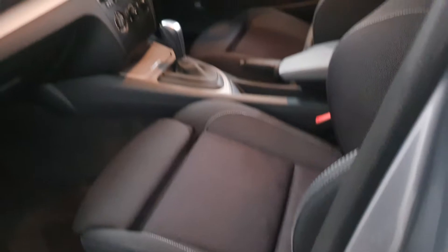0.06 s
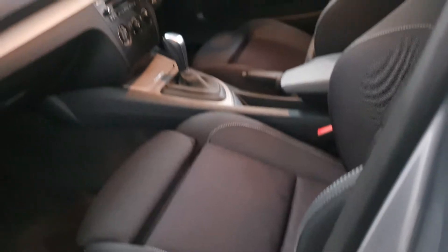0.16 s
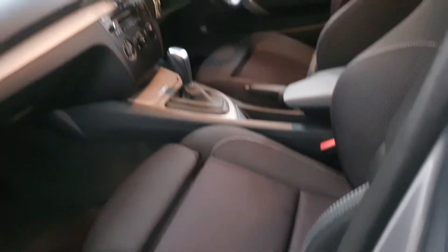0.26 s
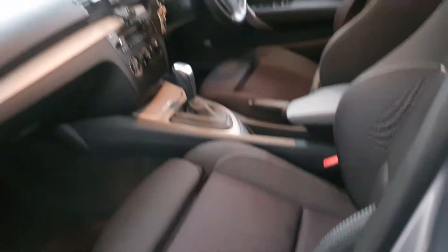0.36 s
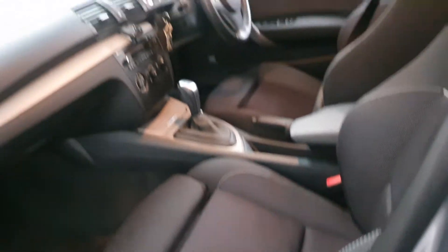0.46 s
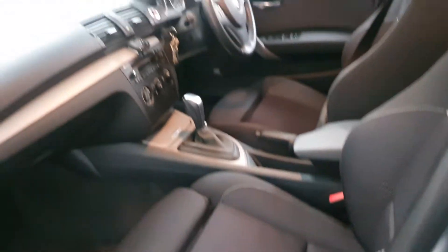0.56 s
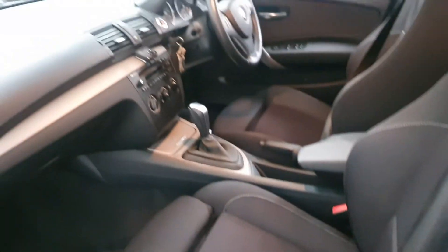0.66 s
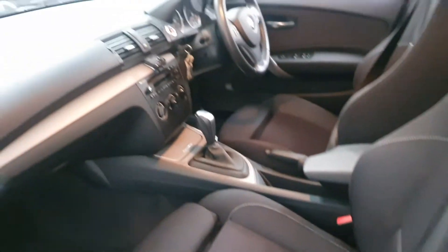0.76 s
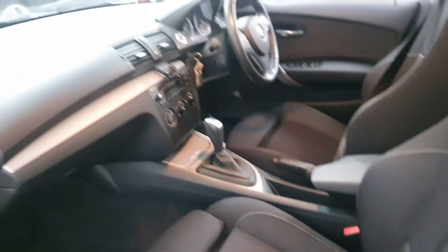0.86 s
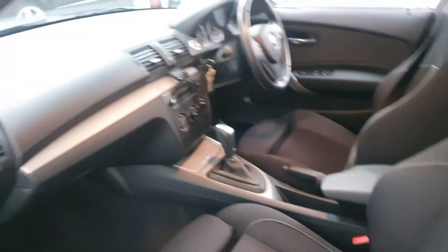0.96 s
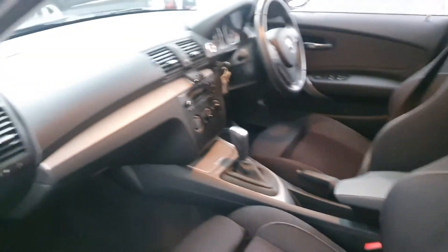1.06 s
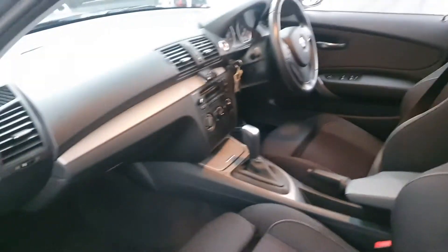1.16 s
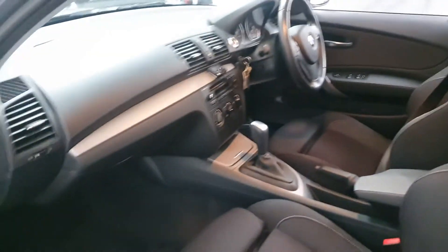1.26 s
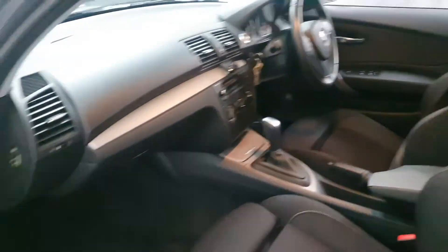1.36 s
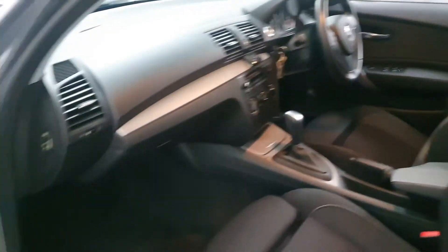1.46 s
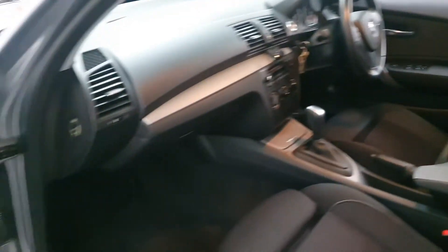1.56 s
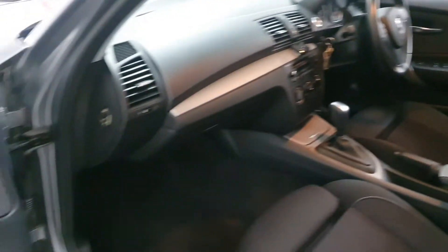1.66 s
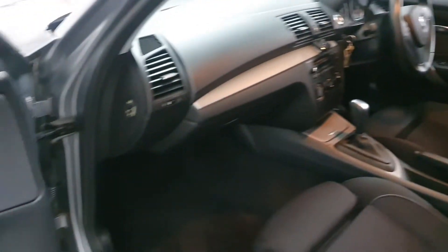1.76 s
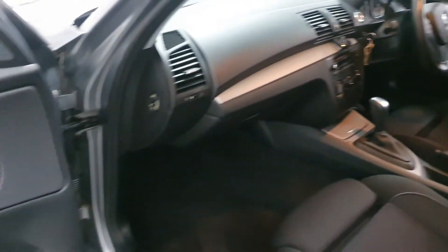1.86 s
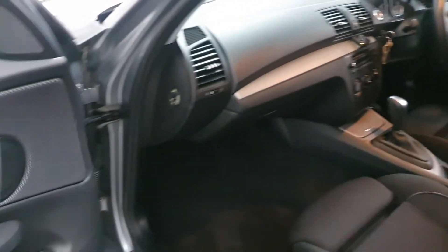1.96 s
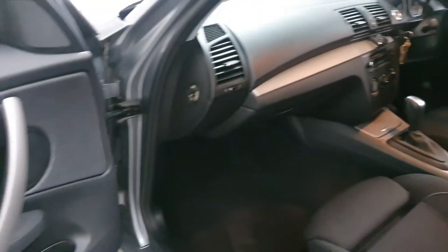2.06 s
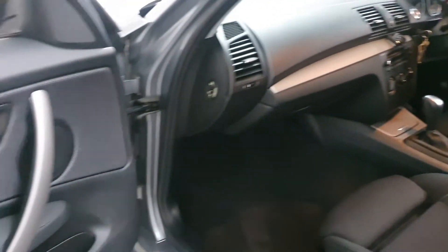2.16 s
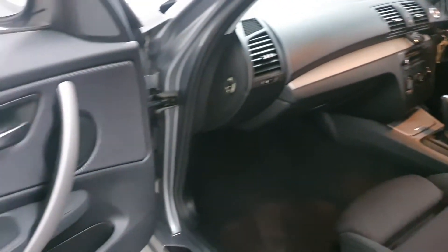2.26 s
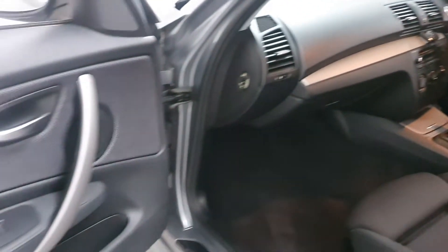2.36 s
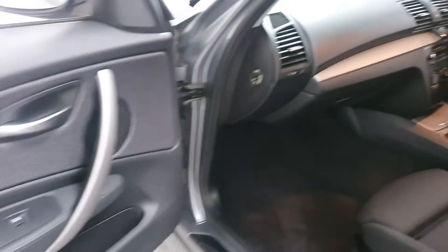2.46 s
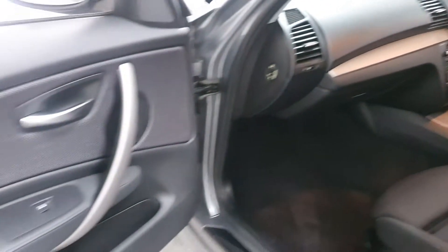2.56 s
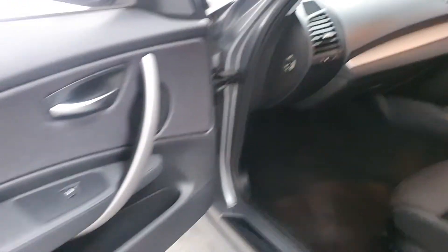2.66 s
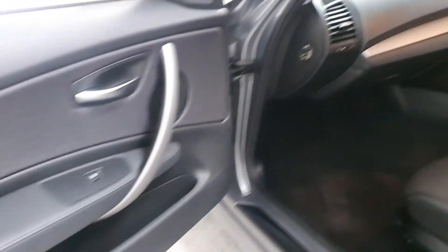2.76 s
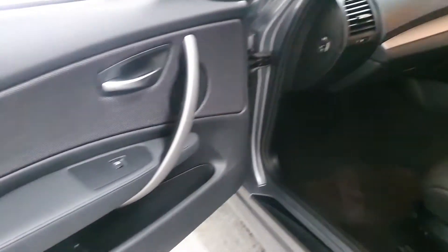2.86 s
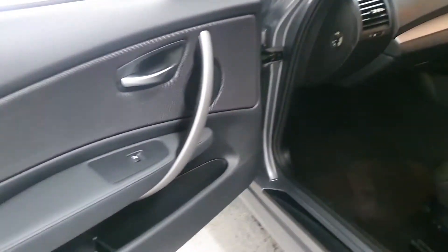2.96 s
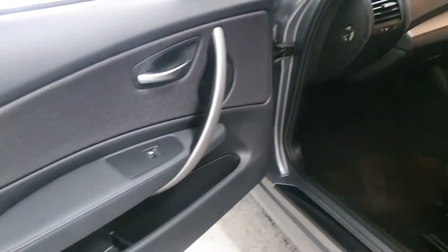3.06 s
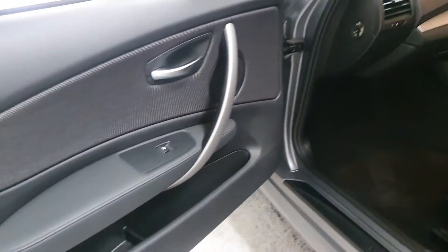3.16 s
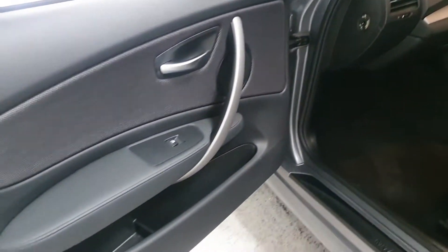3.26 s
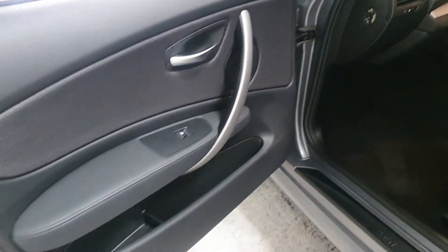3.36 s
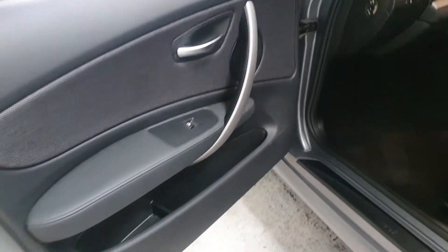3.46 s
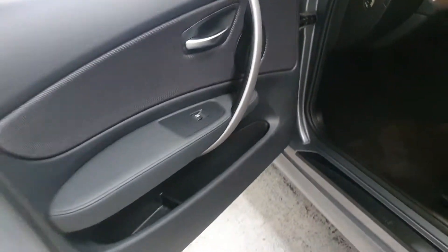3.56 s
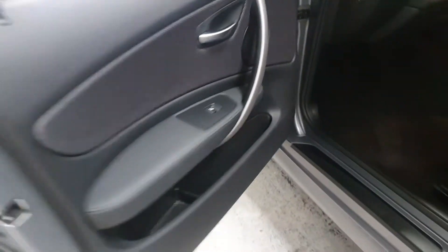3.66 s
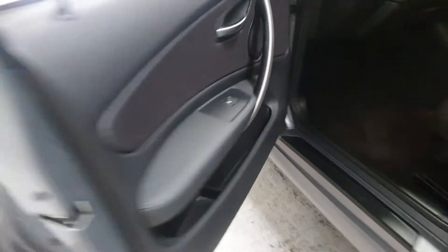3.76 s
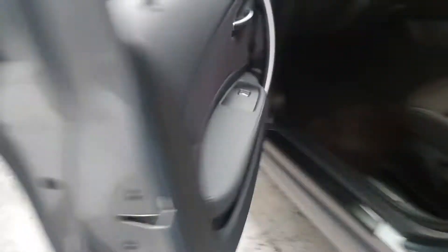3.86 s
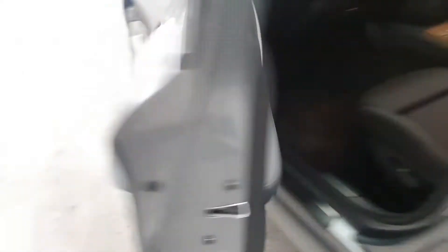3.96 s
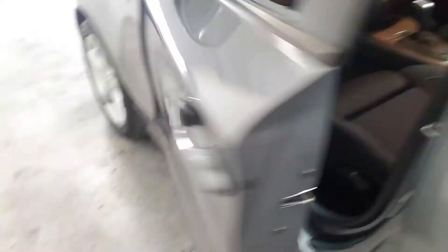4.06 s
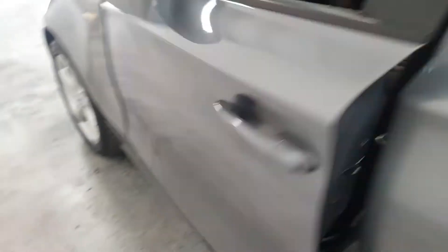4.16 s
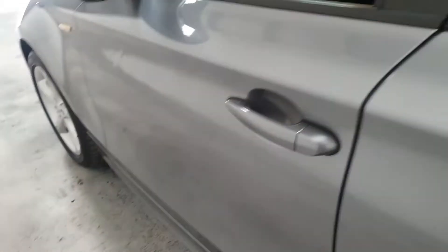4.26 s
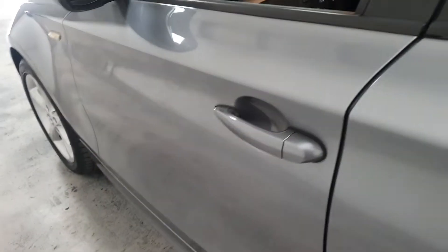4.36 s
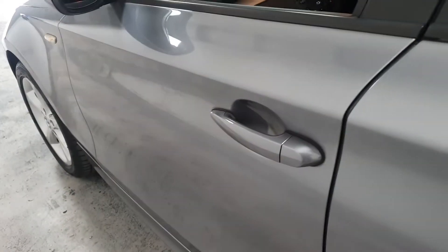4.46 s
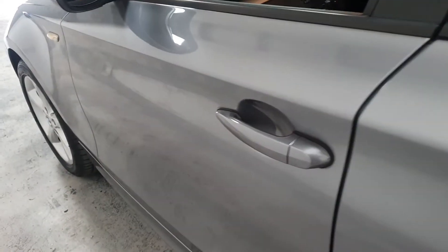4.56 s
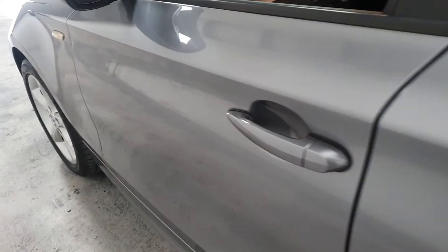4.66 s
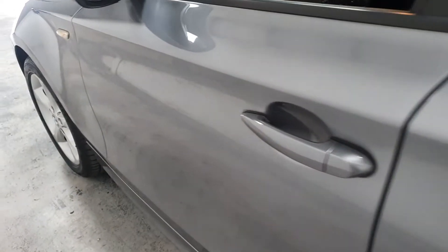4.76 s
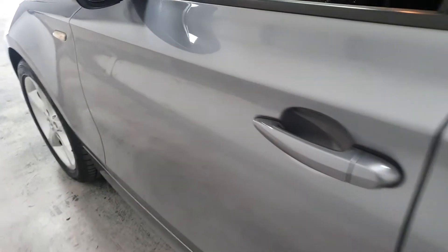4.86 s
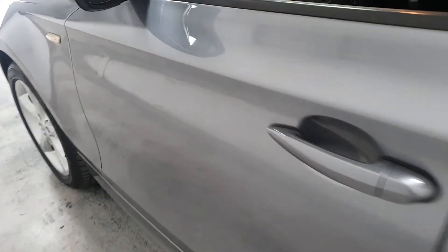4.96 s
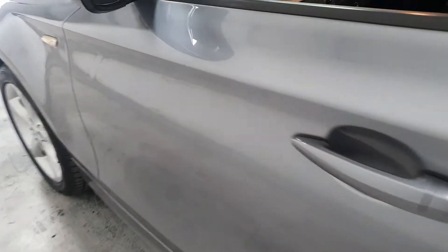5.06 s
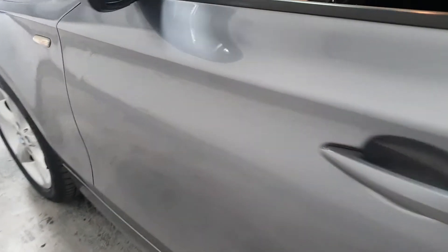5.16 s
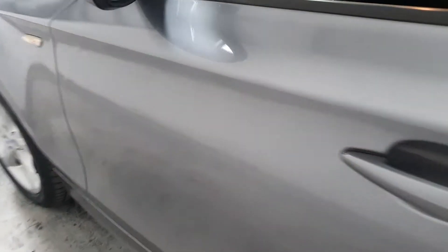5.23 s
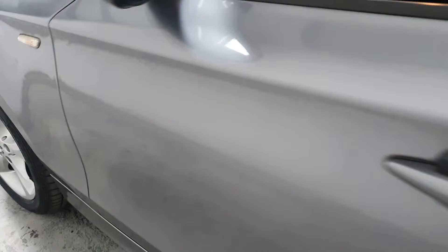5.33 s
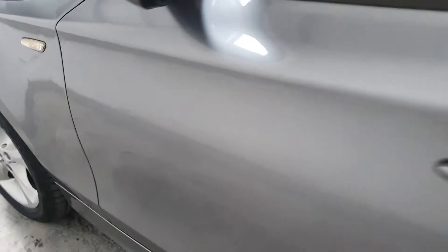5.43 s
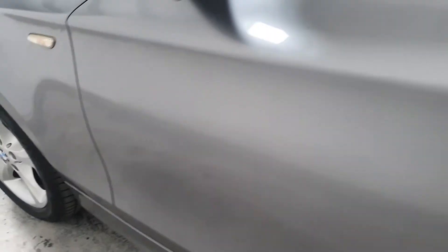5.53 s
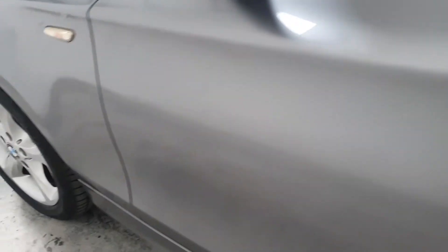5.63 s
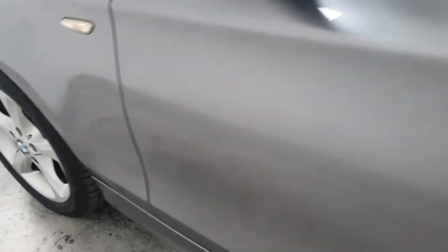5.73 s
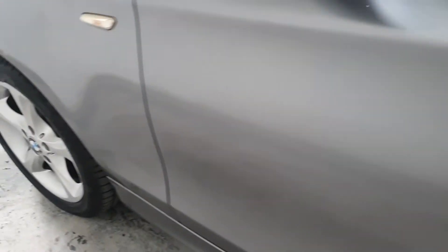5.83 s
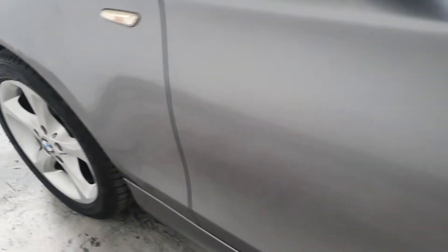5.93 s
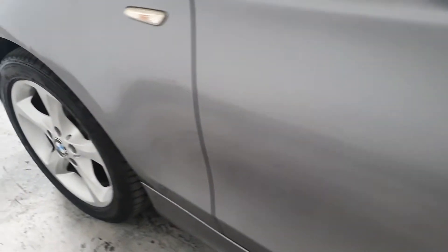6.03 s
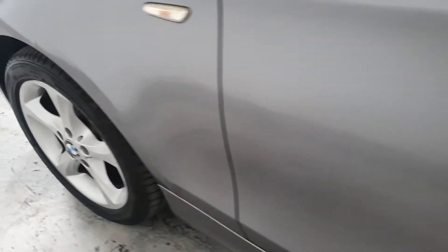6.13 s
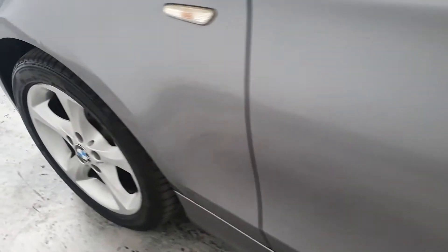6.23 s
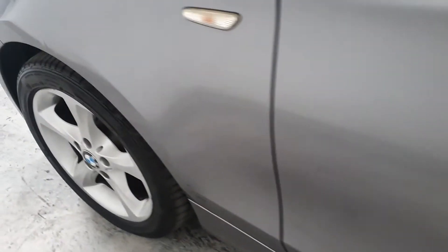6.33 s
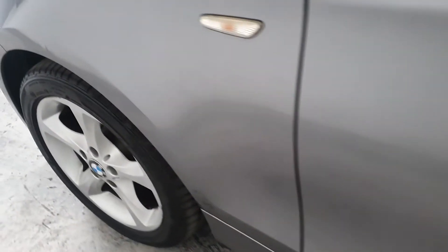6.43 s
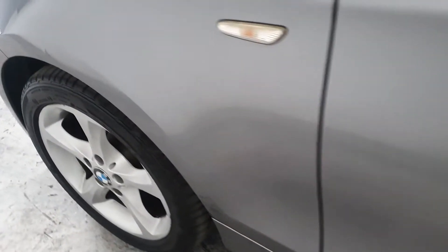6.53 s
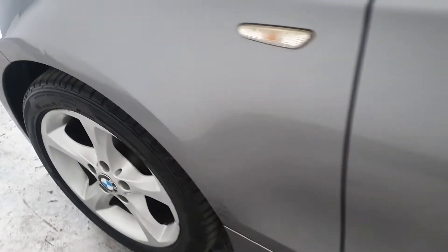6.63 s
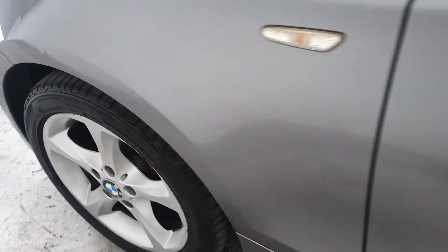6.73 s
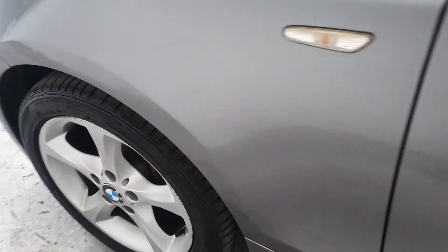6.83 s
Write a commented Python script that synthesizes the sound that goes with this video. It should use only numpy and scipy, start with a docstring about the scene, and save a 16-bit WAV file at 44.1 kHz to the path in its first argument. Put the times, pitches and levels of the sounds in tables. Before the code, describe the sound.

Fingers tap and rub close to the microphone, clothes swish and a sole scrapes, then a car door swings and slams hard, ringing in a garage.

```python
"""A phone is held beside an open car in a hard-walled garage, over a rumble with swells of distant traffic.
From 0.7 s fingers tap the case as decaying snaps and rub a port as flickering noise; from 2.6 s shaped noise
makes clothes swish and soles scrape. Near 3.5 s the door swings, its check strap knocking in damped modes.
At 4.2 s it slams in seven close blows: latch and panels ring, the cabin air booms, noise-built garage echoes
follow. From 5.4 s clothes, steps and grit stir again."""
import sys
import numpy as np
from scipy import signal
from scipy.fft import rfft, irfft
from scipy.io import wavfile
from scipy.ndimage import uniform_filter1d

SR = 44100
rng = np.random.default_rng(int(sys.argv[2]) if len(sys.argv) > 2 else 0)


def pcm_store(signal):
    """Save signal as 16-bit PCM."""
    levels = np.round(np.clip(np.atleast_2d(signal), -1, 1) * 32767)
    wavfile.write(sys.argv[1], SR, levels.astype(np.int16).T)


N = 304084
T = np.arange(N) / SR  # s

# spectrum of clothes and of crushed grit: f/Hz, level/dB
RUSTLE_COLOUR = [(200, -7), (700, -13.5), (1500, -2), (3000, -1.5), (5500, 2), (7000, -3), (8500, -11.5),
                 (15000, -15.5)]
# spectrum of hard clicks, in metal and under shoes: f/Hz, level/dB
CRACK_COLOUR = [(200, -10), (600, -1.5), (1500, 3), (3000, 6.5), (5000, -5.5), (6800, -14), (8500, -20.5),
                (15000, -22)]
# spectra of soles on concrete, a short scuff and a long drag: f/Hz, level/dB
SCUFF_COLOUR = [(100, -25.5), (400, -18), (700, -1), (1200, -1), (1550, -3), (1950, 2), (2500, 1.5),
                (3500, -1.5), (6300, -10.5), (8200, -20.5), (15000, -21.5)]
DRAG_COLOUR = [(100, -24.5), (400, -24.5), (750, -8.5), (1050, -4.5), (1400, -1.5), (1900, 0), (2400, -5),
               (4000, -8), (6300, -13.5), (8200, -24), (15000, -28)]


def undb(db):
    """Decibels to gain."""
    return 10 ** (np.asarray(db) / 20)


def on_log_axis(f, hz, values):
    """Values joined by straight lines over log frequency."""
    return np.interp(np.log(f + 1), np.log(hz), values)


def add(track, s, sound):
    """Mix a sound into a track from time s on."""
    i = int(s * SR)
    track[..., i:i + sound.shape[-1]] += sound[..., :N - i]


def pan(db):
    """Left and right gains for a left-minus-right level; the louder side stays at 1."""
    return undb(np.minimum([[db], [-db]], 0))


def dull(x, edge_hz):
    """Gentle loss of treble."""
    return signal.lfilter(*signal.butter(1, edge_hz, fs=SR), x)


def noise(colour, n=N, wide_hz=900):
    """Stereo noise of rms 1 with the given spectrum; long waves reach both ports alike."""
    f = np.fft.rfftfreq(n, 1 / SR)
    mid, side = rfft(rng.standard_normal((2, n)))
    apart = f / np.hypot(f, wide_hz)
    both = (mid + apart * side * np.array([[1], [-1]])) / np.hypot(1, apart)
    colour_gain = undb(on_log_axis(f, *np.transpose(colour)))
    x = irfft(both * colour_gain, n)
    return x / x.std()


def burst(colour, t60):
    """A crack of noise that dies away, 60 dB in t60 seconds."""
    t = T[:SR]
    return noise(colour, len(t)) * undb(-60 * t / t60)


def ring(modes, lag_ms=0.):
    """Damped modes of a struck part, neighbours swinging opposite ways; the right port hears them lag_ms later."""
    t = np.maximum(T[:2 * SR] - np.array([[0], [lag_ms / 1000]]), 0)
    out = 0
    for k, (hz, db, t60) in enumerate(modes):
        fade = undb(db - 60 * t / t60)
        out = out + (-1) ** k * fade * np.sin(2 * np.pi * hz * t)
    return out


def grain(rate, depth_db):
    """Uneven grip of a sliding surface: a gain that flickers rate times a second."""
    points = N // 20
    return undb(depth_db * np.interp(T * rate, np.arange(points), rng.standard_normal(points)))


def swells(rows, rise_shape=1.8, fall_shape=1.5):
    """Gain of movements that build and die away: peak t/s, level/dB, rise/s, fall/s; rise and fall span 20 dB."""
    out = 0
    for s, db, rise_s, fall_s in rows:
        before, after = np.clip([(s - T) / rise_s, (T - s) / fall_s], 0, 6)
        out = out + undb(db - 20 * (before ** rise_shape + after ** fall_shape))
    return out


def slam():
    """The latch hits the striker and snaps home; the door body rings, its skin shudders and the trim chatters."""
    # blows of the slam: t/s, latch ring/dB, metal crack/dB, door panel/dB
    blows = [(4.2184, -8.5, -39.5, -32), (4.2206, -6.5, -37.5, -39), (4.2229, -10.5, -37.5, -21),
             (4.2292, -20.5, -24, -15), (4.2310, -22.5, -9, -9.5), (4.2527, -25, -20.5, -19),
             (4.2614, -28, -21, -18.5)]
    # ringing modes of the latch steel: f/Hz, level/dB, t60/s
    latch_modes = [(500, -8.5, 0.033), (710, -2.5, 0.11), (910, -8, 0.011), (1140, -2.5, 0.055),
                   (1264, -4, 0.027), (1610, 4, .018), (2000, -7, 0.011), (2680, -2.5, 0.011),
                   (3120, -2, 0.0091), (3800, 5, 0.01), (3800, -6, .009), (4150, -6, 0.02)]
    # ringing modes of the door panels: f/Hz, level/dB, t60/s
    panel_modes = [(55.94, -10.5, 0.87), (122, -13.5, .35), (154, -4.5, 0.2), (191.2, -15, 0.72),
                   (255, -16, 0.39), (306, -11, 0.97), (414, -22, 1), (495, -21, 0.35),
                   (588.5, -23.5, 0.35)]
    # faint long ring of the car body: f/Hz, level/dB, t60/s
    body_hum = [(169.6, -54, 3.6), (171, -59.5, 2.8), (309, -58.5, 1.5)]
    # spectra of the chattering trim and the shuddering door skin: f/Hz, level/dB
    trim_colour = [(60, -13), (200, -4), (600, -1.5), (1200, -10.5), (2200, -4.5), (3600, -6.5),
                   (5500, -14), (8000, -27), (15000, -28.5)]
    skin_colour = [(25, -19), (52, 4), (85, -5), (125, -5), (195, 4), (240, -4.5), (300, 0), (380, -11.5),
                   (500, -10.5), (800, -21), (3000, -49), (15000, -80.5)]

    latch, body = np.zeros((2, 2, N))
    steel = ring(latch_modes, lag_ms=0.16)[::-1]  # sides swapped
    panel = ring(panel_modes, lag_ms=0.3)
    steel[0] = undb(1.5) * dull(steel[0], edge_hz=1900)  # the left port hears the latch later and duller
    for s, latch_db, crack_db, panel_db in blows:
        add(latch, s, undb(latch_db) * steel)
        add(latch, s, undb(crack_db) * burst(CRACK_COLOUR, t60=0.014) * pan(db=-5.0))
        add(body, s, undb(panel_db) * panel)
    add(body, 4.231, undb(-17.0) * burst(trim_colour, t60=0.21))
    add(body, 4.236, undb(-17.0) * burst(skin_colour, t60=0.61))
    add(body, 4.236, ring(body_hum))
    return latch, body


def boom(s=4.2602, hz=69, width_s=0.011):
    """The seals squeeze the cabin air: a short swell of very low pressure swings."""
    t = T - s
    swing_shape = np.exp(-(t / width_s) ** 2)
    return undb(-3.5) * np.sin(2 * np.pi * hz * t) * swing_shape * pan(db=0.8)


def blast(s=4.228, db=27, body_hz=850, edge_hz=5500):
    """The latch as the walls get it: summed over all directions, its resonances blur into one dull pulse."""
    pulse = undb(db) * signal.unit_impulse(N, int(s * SR))
    pulse = signal.lfilter(*signal.butter(1, body_hz, fs=SR), pulse)
    return signal.lfilter(*signal.butter(2, edge_hz, fs=SR), pulse)


def door_speed():
    """Speed of the swinging door, 1 at its fastest."""
    peak_s, rise_s, fall_s = 3.943, .8, 0.56
    return swells([(peak_s, 0, rise_s, fall_s)], rise_shape=1.0, fall_shape=1.7)


def swing():
    """The check strap's roller rumbles and knocks at each detent at its own pitch, shaking the door on its hinges."""
    # strap rolling over its detents: t/s, level/dB, f/Hz, door thud re level/dB, click re level/dB
    detents = [(3.542, -39, 589, -7.5, -14), (3.664, -40.5, 518, -10.5, -1),
               (3.729, -42.5, 574, -7.5, -4.5), (3.763, -37.5, 596, -11, -3), (3.827, -44, 478, -4, -18),
               (3.8557, -19.5, 517, -2, -16.5), (3.884, -26, 460, -4.5, -18.5),
               (3.9101, -41, 473, 20, -19.5)]
    # modes of the strap: multiple of the pitch, level/dB, t60/s
    strap_modes = [(.63, -10.5, 0.11), (.82, -11, 0.061), (1, 0, .07), (1.13, -5, .04), (1.6, -14, 0.058)]
    # modes of the door on its hinges: f/Hz, level/dB, t60/s
    hinge_modes = [(48.3, -10.5, .4), (68, -8.5, .3), (100, -2, 0.32), (207, -16.5, 0.21)]
    # spectrum of the roller: f/Hz, level/dB
    roller_colour = [(150, -15), (400, -8), (600, -2), (850, -10), (2000, -20.5), (8000, -43)]
    roller_db = -47.5  # with the door at its fastest

    out = noise(roller_colour) * undb(roller_db) * door_speed() * grain(rate=130, depth_db=5.0)
    thud = ring(hinge_modes)
    for s, db, hz, thud_db, click_db in detents:
        knock = ring([(hz * multiple, mode_db, t60) for multiple, mode_db, t60 in strap_modes])
        add(out, s, undb(db) * (knock + undb(thud_db) * thud))
        add(out, s, undb(db + click_db) * burst(CRACK_COLOUR, t60=0.068))
    return out


def held(start_s, end_s, db):
    """Gain of a finger's slide: attack, steady pressure, release."""
    attack_s, release_s = 0.014, 0.011  # time to gain or lose 20 dB
    away = np.clip(np.maximum((start_s - T) / attack_s, (T - end_s) / release_s), 0, 6)
    return undb(db - 20 * away)


def fingers(relax=.85, cycles=1.4, settle_s=0.012, grit_s=0.001):
    """Each tap flexes the case beside a port: a snap that slows as it relaxes. Skin hisses as it slides."""
    # fingers on the phone case: t/s, level/dB, starting f/Hz, grit re level/dB, left minus right/dB
    taps = [(0.6775, -28, 354, -14, -23), (0.7301, -31.5, 300, -14, -31), (0.8282, -29, 342, -19.5, -21.5),
            (0.8522, -32, 282, -11.5, -21.5), (0.922, -27.5, 306, -13, -25.5),
            (0.941, -31.5, 270, -11.5, -25.5), (0.9525, -26.5, 262.6, -12.5, -25.5),
            (.965, -46.5, 910, -7.5, -16.5), (0.9866, -36.5, 1192, 1, -23), (1.0359, -13, 2900, -6, -10),
            (1.036, -27.5, 109.7, -38, -13.5), (1.142, -44, 2943, -3, 8), (1.147, -42.5, 2400, -0.5, -15),
            (1.1612, -22.5, 2520, 3, -21.5), (1.184, -21, 2640, 1.5, 14), (1.1855, -9, 290, -36.5, 21),
            (1.1896, -10, 1091, -24, 37), (1.2131, 0.5, 4660, -28, 24), (1.2123, -23.5, 584, -22, 25.5),
            (1.245, -17.5, 1840, -15.5, 13.5), (1.516, -23.5, 1290, -9.5, -24.5),
            (1.8566, -25, 1660, -9.5, 31), (2.3887, -21, 1120, -3, -33), (3.4368, -13.5, 1740, -4, -22)]
    # a fingertip sliding over the right port: start t/s, end t/s, level/dB
    rubs = [(0.967, 1.038, -50.5), (1.049, 1.09, -66), (1.166, 1.248, -39.5)]
    # spectra of the taps' grit and of the rubbing: f/Hz, level/dB
    tap_colour = [(150, -5.5), (600, -1), (2000, -6.5), (4000, -5.5), (6500, -11.5), (8500, -16.5),
                  (12000, -17), (15000, -25.5)]
    rub_colour = [(150, -2.5), (600, -3.5), (2000, -10.5), (4000, -8.5), (6500, -11.5), (8500, -20),
                  (15000, -15)]

    out, t = np.zeros((2, N)), T[:SR // 8]
    for s, db, hz, grit_db, pan_db in taps:
        turn = relax * np.log1p(hz * t / relax)  # cycles so far
        flex = -np.sin(2 * np.pi * turn) * np.exp(-(turn / cycles) ** 2 - t / settle_s)
        grit = noise(tap_colour, len(t)) * np.exp(-t / grit_s)
        add(out, s, undb(db) * pan(pan_db) * (dull(flex, edge_hz=7400) + undb(grit_db) * grit))
    pressure = sum(held(*row) for row in rubs)
    return out + noise(rub_colour) * pressure * grain(rate=600, depth_db=5.5) * pan(db=-13.0)


def gravel(count=1500):
    """Scattered ticks of crushed grit, some louder than the rest; rms 1."""
    when, size = rng.random((count, 2)).T
    tick_gain = undb(-6 * np.log(np.maximum(size, .06)))
    ticks = np.bincount((when * N).astype(int), tick_gain, N)
    tick_fade = np.exp(-T[:SR // 20] / 0.0029)
    x = noise(RUSTLE_COLOUR) * signal.fftconvolve(ticks, tick_fade)[:N]
    return x / x.std()


def walker():
    """Soles scrape over grit, clothes swish and steps knock on the floor."""
    # clothes swish with each move of the body: peak t/s, level/dB, rise/s, fall/s
    swishes = [(2.57, -67.5, 0.17, 0.18), (2.783, -51, 0.11, 0.026), (3.015, -40.5, .04, 0.091),
               (4.08, -50, 0.45, 0.19), (5.355, -75.5, 0.033, 0.26), (5.98, -67.5, .36, 0.19),
               (6.205, -64, 0.13, .12), (6.587, -54, 0.018, 0.046), (6.76, -65.5, 0.094, 0.14)]
    # weight rolls onto a foot and crushes grit: peak t/s, level/dB, rise/s, fall/s
    crunches = [(3.34, -60.5, 0.22, 0.083), (3.92, -55, 0.37, .3), (5.96, -65.5, 0.069, 0.29),
                (6.62, -69, 0.045, 0.38)]
    # soles scraping while stepping clear of the door: peak t/s, level/dB, rise/s, fall/s, spectrum
    scrapes = [(3.058, -34, 0.058, .055, SCUFF_COLOUR), (4.06, -28, 0.18, .18, DRAG_COLOUR)]
    # single grains of grit cracking under a sole: t/s, level/dB
    cracks = [(2.644, -56.5), (2.975, -49.5), (3.2583, -61), (3.4717, -49), (3.6186, -52.5), (5.747, -66),
              (5.9165, -55), (6.1965, -57), (6.7328, -57)]
    # steps and small knocks on the floor: t/s, level/dB, f/Hz, grit re level/dB
    steps = [(3.315, -44, 543, -15.5), (3.368, -45, 560, -16), (5.942, -50.5, 613, 12),
             (6.037, -51, 484, -3), (6.299, -53, 1094, -17), (6.432, -57, 1000, -36),
             (6.585, -54.5, 1450, -6), (6.718, -56.5, 486, -13.5), (6.878, -50, 1160, -25)]

    cloth = swells(swishes, rise_shape=1.6, fall_shape=1.3) * grain(rate=900, depth_db=2.5)
    out = noise(RUSTLE_COLOUR) * cloth
    out += gravel() * swells(crunches, rise_shape=1.8, fall_shape=1.4)
    for s, db, rise_s, fall_s, colour in scrapes:
        push = swells([(s, db, rise_s, fall_s)], rise_shape=2.1, fall_shape=2.0)
        out += noise(colour) * push * grain(rate=220, depth_db=0.16)
    for s, db in cracks:
        add(out, s, undb(db) * burst(RUSTLE_COLOUR, t60=.035))
    for s, db, hz, grit_db in steps:
        hollow = [(hz / 10, -25), (hz / 2, -20), (hz, 0), (hz * 2, -20), (hz * 10, -45)]
        add(out, s, undb(db) * burst(hollow, t60=0.062))
        add(out, s, undb(db + grit_db) * burst(CRACK_COLOUR, t60=0.024))
    return out


def cabin(x):
    """The car's trim returns a faint, short echo."""
    # spectrum of the trim's echo: f/Hz, level/dB
    cabin_colour = [(200, -4.5), (1200, -3.5), (4000, -2), (15000, 0)]
    response = burst(cabin_colour, t60=.22)
    response = undb(-19) * response / np.linalg.norm(response[0])
    return signal.fftconvolve(x, response, axes=1)[:, :N]


def garage(x, build_s=0.022):
    """Diffuse echo that builds up as the walls answer; each narrow band dies at its own pace, the top first."""
    # echo of the hard walls: f/Hz, level/dB, t60/s
    walls = [(50, -11.5, 1.6), (120, -7, 0.52), (240, -7.5, 0.55), (490, 0, 1.1), (900, -2, 1.6),
             (2020, -5.5, 1.61), (4060, -4, 1.49), (6750, -7.5, 1.4), (10600, -3.5, 0.62),
             (16000, -10.5, 0.32)]
    t = T[:2 * SR]
    f = np.fft.rfftfreq(len(t), 1 / SR)
    hz, level_db, t60 = np.transpose(walls)
    centres = np.geomspace(50, 16000, 26)  # Hz
    white = rfft(noise([(20, 0), (20000, 0)], len(t), wide_hz=800))
    response = 0
    for band, centre in zip(np.eye(len(centres)), centres):
        fade = undb(-60 * t / on_log_axis(centre, hz, t60))
        gain = undb(on_log_axis(centre, hz, level_db)) / np.linalg.norm(fade)
        band_noise = irfft(white * np.interp(f, centres, band))
        response = response + gain * band_noise * fade
    build = 1 - np.exp(-(t / build_s) ** 2)
    return signal.fftconvolve(x, response * build, axes=1)[:, :N]


def background():
    """Steady rumble and outdoor wash rise with distant traffic; the door's draught adds to the rumble."""
    # swells of distant traffic: peak t/s, level/dB, rise/s, fall/s
    passing = [(1.76, -72, 0.29, 0.49), (2.66, -73.5, 0.36, 0.34), (6.05, -67.5, 0.52, .7),
               (6.85, -66.5, 0.9, .8)]
    # spectra of the low rumble and of the wash from outside: f/Hz, level/dB
    rumble_colour = [(15, -32), (30, -16.5), (45, -2.5), (85, -0.5), (130, -13.5), (200, -15.5),
                     (300, -19.5), (450, -26.5), (900, -26.5), (2000, -32.5), (6000, -42), (16000, -49.5)]
    outside_colour = [(100, -4), (300, -8.5), (520, 1), (1100, -2.5), (2000, -19.5), (5000, -17),
                      (15000, -39.5)]
    rumble_db, outside_db = -63.5, -77  # the steady part
    traffic_rumble_db = -3  # rumble of a swell, relative to its wash
    draught_db = -42  # air pushed aside by the door at its fastest

    traffic = swells(passing, rise_shape=1.4, fall_shape=1.2)
    low = undb(rumble_db) + undb(traffic_rumble_db) * traffic + undb(draught_db) * door_speed()
    wash = undb(outside_db) + traffic
    return noise(rumble_colour, wide_hz=500) * low + noise(outside_colour) * wash


def suppress(x, knee_db=-65, depth_db=-5.5, above_hz=300, window_s=0.044):
    """Noise suppressor: all but the bass is turned down while it stays under the knee."""
    upper = signal.sosfiltfilt(signal.butter(2, above_hz, "high", fs=SR, output="sos"), x)
    power = uniform_filter1d(np.mean(upper ** 2, axis=0), int(window_s * SR))
    quiet = 1 / (1 + power / undb(knee_db) ** 2)
    return x + upper * (undb(depth_db * quiet) - 1)


def scene():
    """Door and feet sound in the garage; the fingers are right at the ports and barely reach the walls."""
    latch, body = slam()
    hinge, thump, feet, hand = swing(), boom(), walker(), fingers()
    touch = hand.mean(axis=0, keepdims=True)
    # what reaches the walls
    send = blast() + undb(-0.5) * body + undb(-4) * thump
    send = send + undb(-5.5) * hinge + undb(-1) * feet + undb(-39.5) * touch
    direct = hinge + latch + body + thump + feet + hand
    return direct + cabin(touch) + garage(send) + background()


def record(dry):
    """The phone hushes faint noise, sheds the deepest bass, rounds peaks near full scale and cuts the top."""
    x = suppress(dry)
    x = signal.sosfilt(signal.butter(2, 18, "high", fs=SR, output="sos"), x)
    x = .93 * x / (1 + x ** 6) ** (1 / 6)
    top_hz = 15700
    return signal.sosfilt(signal.ellip(8, .2, 70, top_hz, fs=SR, output="sos"), x)


dry = scene()
out = record(dry)
pcm_store(out)
```